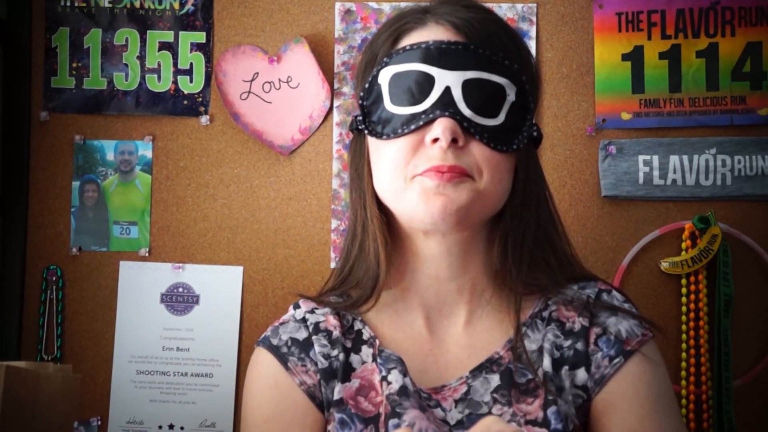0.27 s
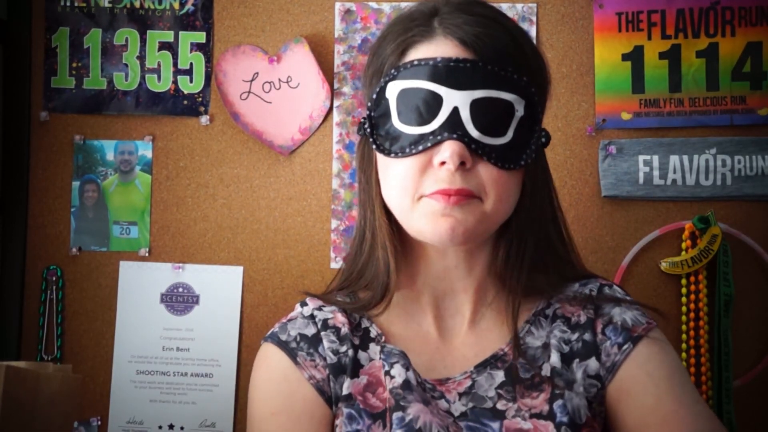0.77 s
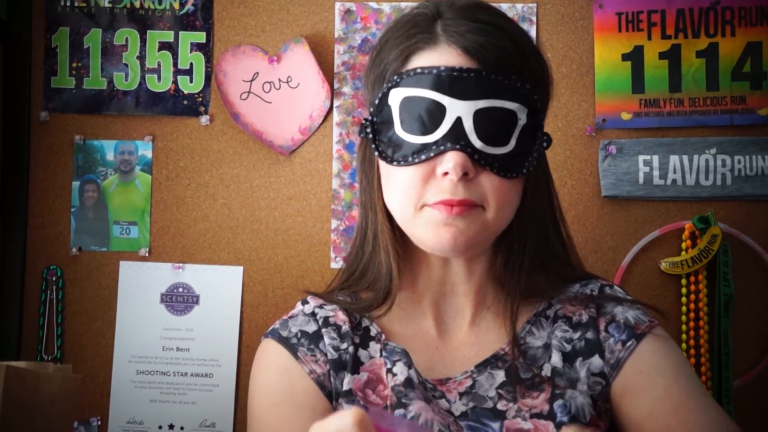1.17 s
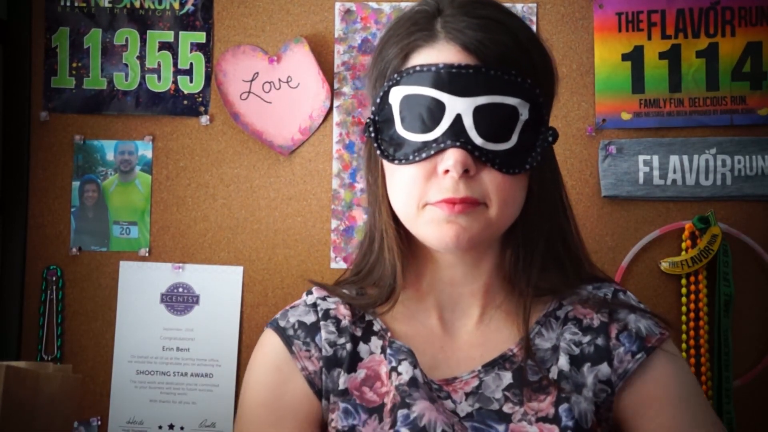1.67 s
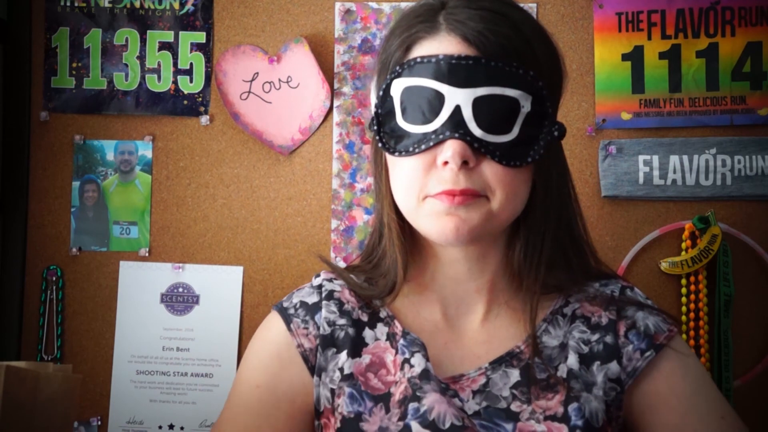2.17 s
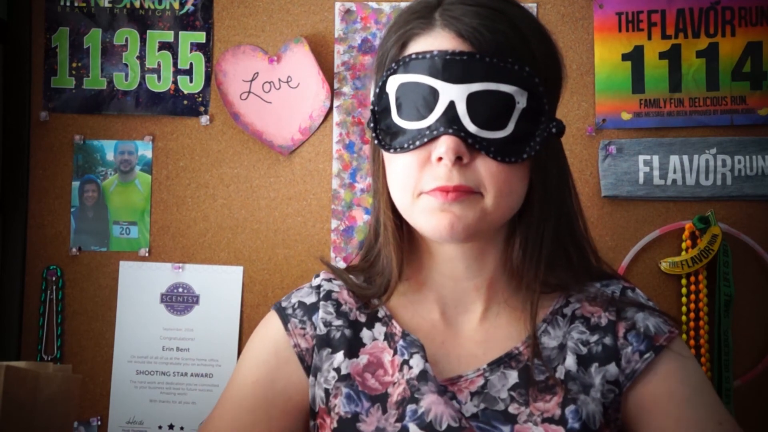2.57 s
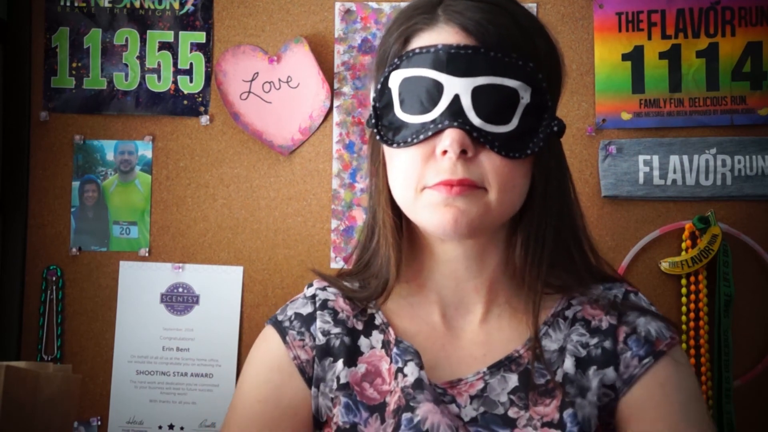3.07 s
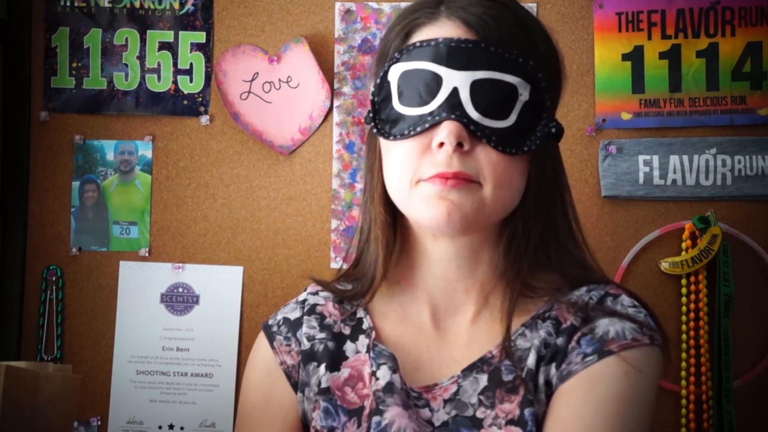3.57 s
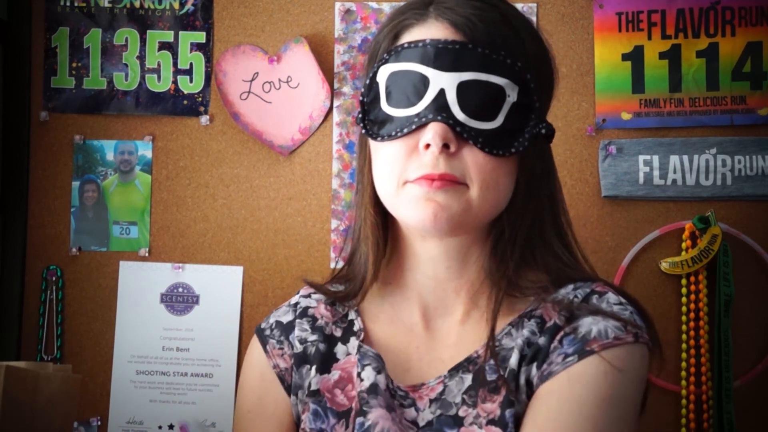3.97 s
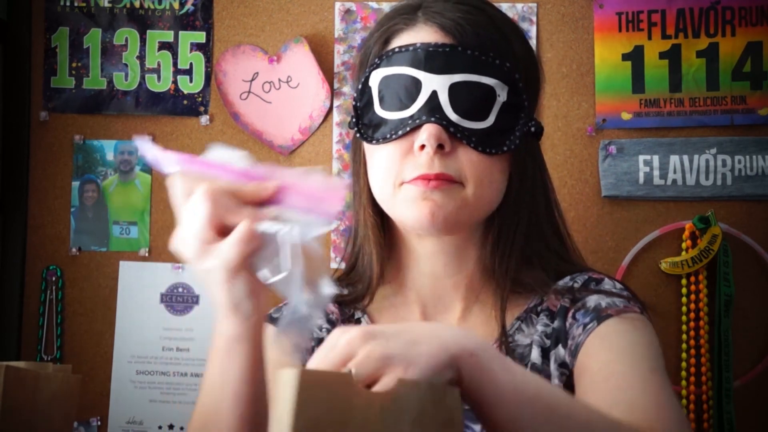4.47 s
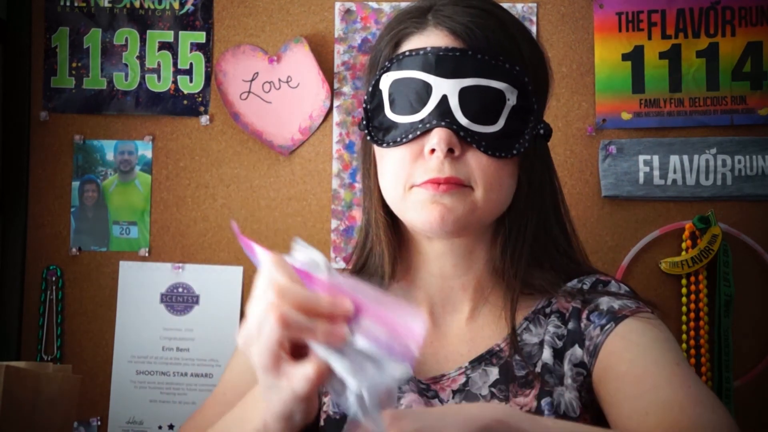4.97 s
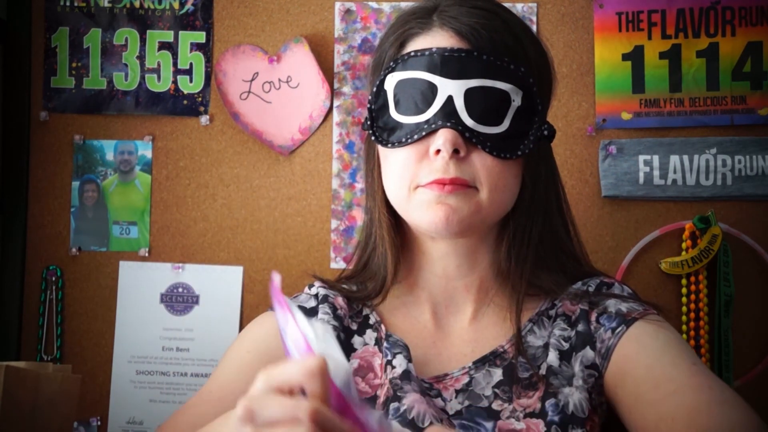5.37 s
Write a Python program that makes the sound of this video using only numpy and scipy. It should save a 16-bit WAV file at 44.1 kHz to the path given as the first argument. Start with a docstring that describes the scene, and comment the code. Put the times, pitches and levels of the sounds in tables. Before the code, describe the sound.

In a small room, hands fiddle with a thin plastic pouch: quiet, bright crackles and sharp ticks, growing busier. After about three and a half seconds a paper bag takes over with a soft hollow knock, then loud, coarse crumpling in surges. Close stereo microphone at arm's length, short room reflections, faint steady fan hum and hiss behind.

```python
"""First a thin plastic pouch crackles in the hands; from 3.44 s a brown paper bag does, in a small room.
Creases snap: short noise bursts, each ringing a facet, over a dense crackle of random clicks and hiss.
A hand knocks the hollow bag once: a rough push sets five decaying tones ringing.
Desk and walls send delayed copies and a fading noise tail to a stereo microphone at arm's length.
Behind it, coloured noise makes a faint fan hum, hiss and rumble."""
import sys
import numpy as np
from scipy import signal
from scipy.fft import rfft, irfft
from scipy.io import wavfile
from scipy.ndimage import uniform_filter1d, minimum_filter1d

SR = 44100
rng = np.random.default_rng(int(sys.argv[2]) if len(sys.argv) > 2 else 0)


def inscribe(sig):
    """Save sig as 16-bit PCM at rate SR to the path in sys.argv[1].

    A 1-D sig is mono; a 2-D sig holds one channel per row.
    Samples are clipped to [-1, 1] before scaling.
    """
    pcm = np.round(np.clip(np.atleast_2d(sig).T, -1, 1) * 32767)
    wavfile.write(sys.argv[1], SR, pcm.astype(np.int16))


N = 248724  # length in samples
SWAP_S = 3.44  # the pouch is put down, the paper bag taken
BOOM_HZ, CRISP_HZ = 1200, 4500  # boom lies below the first, crisp above the second, middle between

POUCH_FLIP_MS, BAG_FLIP_MS = 0.18, 0.6  # burst decay time: thin plastic flips faster than stiff paper
FACET_HZ = 2500  # ring of a middle-sized facet, for which BAG_FLIP_MS holds

# Creases that buckle audibly. Each row: start in seconds, level of the middle range in dB over one
# millisecond (before the common gain), ring in Hz, boom and crisp in dB relative to the middle.
SNAPS = [(0.0109, -29, 3200, -22, -21), (0.1223, -23, 4970, -6.5, 2), (0.1755, -36, 2750, -0.5, 6),
         (0.3159, -28.5, 2770, -13, 8.5), (0.3238, -35, 7660, -18, 20), (0.4036, -27, 4700, -13.5, -9.5),
         (0.602, -38.5, 3900, -25, 1), (0.7369, -28.5, 2100, -15, -3), (0.9251, -31, 5600, -1, 7.5),
         (0.9932, -41.5, 1980, 8, 4), (1.059, -40, 850, 8, -17), (1.1252, -39.5, 3000, 2.5, 6),
         (1.2347, -28, 1820, -2.5, -2.5), (1.4074, -38.5, 4730, 8.5, 5.5), (1.4487, -31.5, 3190, 3, -2.5),
         (1.5161, -31, 2330, -12, 2), (1.5772, -33.5, 2070, -1, 1), (1.5815, -32, 7350, 1, 6),
         (1.633, -30, 5500, -3, 2), (1.7682, -29, 2760, 1, 0), (1.8142, -35, 2130, 8.5, 10),
         (1.8438, -37.5, 1290, 7, 13.5), (1.8858, -22, 3400, -2, 0), (1.8908, -34, 8340, -7, 16.5),
         (1.925, -22, 6700, -18, 2), (1.978, -31, 3450, -28, 2.5), (1.9971, -22.5, 6100, -19, 4.5),
         (2.1425, -22, 1270, -4, -13), (2.1951, -23.5, 4460, -26, 0), (2.2009, -20, 2820, -22, -1.5),
         (2.284, -28.5, 1890, -19, 3.5), (2.3592, -28, 1240, -10, -1), (2.3678, -29.5, 4830, 1.5, 13),
         (2.5562, -13.5, 2160, -7.5, -5.5), (2.5936, -23, 2240, -16, -2.5), (2.652, -33, 2870, 4, 2),
         (2.6671, -16, 4400, -11, -7), (2.683, -26.5, 4480, -5, 4), (2.7484, -21.5, 1220, -5.5, -3),
         (2.8201, -31, 2240, 3, 9), (2.8739, -24.5, 1560, -1, -8.5), (2.9556, -30, 1190, -4, -0.5),
         (2.9693, -29, 3420, -3, -4), (3.0076, -26.5, 3880, -4, 8.5), (3.6857, -34.5, 1030, -20, -2),
         (3.7181, -23.5, 2050, -30, -13), (3.725, -19, 2320, -14, -9), (3.769, -18.5, 1890, 5, -20),
         (3.9169, -27, 1010, 6.5, -5), (3.936, -6.5, 2210, -3, -4), (4.045, -15.5, 1400, -3.5, -16),
         (4.0542, -16, 1270, -16, 3), (4.0668, -12.5, 2250, -2, 0.5), (4.1012, -10, 2160, 8, 2),
         (4.1614, -8, 1710, -14, -12), (4.2387, -6, 2500, -13.5, -2), (4.272, -15.5, 2470, -4, 0),
         (4.3267, -32, 3540, -26, 7.5), (4.3724, -28, 1830, 3.5, -13), (4.4607, -26.5, 2210, 3, -5),
         (4.4687, -21.5, 3400, 2, -16), (4.5426, -36.5, 1920, -26, 8), (4.6, -9, 2810, -8.5, -10),
         (4.7053, -28, 2880, -26, -2), (4.844, -27, 1280, -5, -28), (4.8728, -25.5, 1240, 3.5, -30),
         (4.9693, -35.5, 2100, 0, -19), (5.0057, -24, 1170, -0.5, -8), (5.0226, -25.5, 2220, 9.5, 3.5),
         (5.0731, -15, 3800, -2.5, -4), (5.1582, -28.5, 2540, -10, 10.5), (5.2032, -22.5, 3340, -2, 4.5),
         (5.2146, -25, 4970, -21, 9.5), (5.2314, -13.5, 1160, -7.5, -23), (5.2875, -27.5, 2240, -8, 2),
         (5.3057, -10.5, 1980, -11, -5.5), (5.3281, -16, 1230, 6.5, -15), (5.3845, -14.5, 900, -10, 4),
         (5.3874, -14, 2900, -24, 2), (5.6081, -20, 884, 4, -7), (5.6132, -19, 3500, -1.5, -20)]


def snaps(ring_db=-3, ring_cycles=2.2, gain_db=-2.0):
    """Each crease flips in a brief noise burst; the facet beside it rings a few cycles."""
    size = 256
    t = np.arange(size) / SR
    sheet = bands()
    chance = rng.standard_normal((len(SNAPS), 3, size))
    out = np.zeros(N + SR)
    for (start_s, db, hz, boom_db, crisp_db), noise in zip(SNAPS, chance):
        # a large paper facet rings low and flips slowly
        flip_ms = POUCH_FLIP_MS if start_s < SWAP_S else BAG_FLIP_MS * FACET_HZ / hz
        flip = noise * np.exp(-t * 1000 / flip_ms)

        ring = 2 * np.cos(2 * np.pi * hz * t) * np.exp(-t * hz / ring_cycles)
        facet = undb(ring_db) * hz / SR * ring
        flip = flip + signal.fftconvolve(flip, facet[None], axes=1)[:, :size]

        parts = signal.fftconvolve(flip, sheet, axes=1)
        parts = parts / np.linalg.norm(parts, axis=1, keepdims=True)
        level = undb(db + gain_db) * np.sqrt(SR / 1000)  # from energy 1 to a level over 1 ms
        snap = level * undb([boom_db, 0, crisp_db]) @ parts
        start = int(start_s * SR)
        out[start:start + len(snap)] += snap
    return out[:N]


def crackle(per_s=450.0, scatter_db=3.5, rub_db=-12, own_db=5.5, gain_db=0.5):
    """Many small creases of scattered size, over the hiss of fingers sliding on the sheet."""
    hit = rng.random(N) < per_s / SR
    sign = rng.choice([-1, 1], N)
    size = hit * sign * undb(scatter_db * np.minimum(rng.exponential(size=N), 3.0))
    parts = []
    for gain in hands():
        # every facet has its own balance of boom and crispness
        own = undb(own_db * rng.standard_normal(N).clip(-2, 2))
        grains = unit(size * own)
        rub = undb(rub_db) * rng.standard_normal(N)
        parts.append(gain * undb(gain_db) * (grains + rub))
    return signal.oaconvolve(np.array(parts), bands(), axes=1)[:, :N].sum(axis=0)


POUCH_BOOM_DB, BAG_BOOM_DB = -5, -3  # boom of the crackle against its middle
# Crisp range against the middle, for a level of -40 dB, and its change per dB of level:
# harder handling bends larger facets and is duller.
CRISP_DB, CRISP_PER_DB = -2.5, -0.053

# Fingers shifting on the sheet, a slow bed of crackle.
# Each row: time in seconds, level in dB before the crackle's common gain.
GRIP = [(0.0, -62), (0.14, -62.5), (0.7, -55.5), (0.8, -57.5), (1.3, -54.5), (1.6, -45), (1.9, -49),
        (2.03, -50), (2.14, -45), (2.37, -41), (2.44, -53.5), (2.58, -48), (2.9, -50), (3.03, -43),
        (3.48, -81.5), (4.6, -47), (4.95, -65), (5.13, -47), (5.5, -49.5), (5.64, -48)]
# Squeezes, each a rush of crackle. Each row: peak time in seconds, peak level in dB (before that gain),
# swell and then fade in milliseconds per 10 dB, extra brightness of the crisp range in dB.
SQUEEZES = [(0.0, -40, 20, 20, -0.5), (0.187, -55, 57, 31, 13), (0.325, -53, 3.3, 3.3, 21),
            (0.741, -34, 7.6, 2.2, 8), (1.62, -58, 34, 18, -10), (2.0, -46.5, 44, 32, 6),
            (2.14, -35.5, 22, 8.5, 3), (2.387, -31.5, 34, 6.7, -2.5), (2.559, -55, 18, 15, -5),
            (3.009, -31.5, 17, 5.6, 2.5), (3.379, -50, 8.6, 9.3, 3), (3.5, -47, 21, 16, -2.5),
            (3.708, -34.5, 10, 23, -10), (3.742, -30, 20, 56, 7.5), (3.773, -19, 13, 16, -6),
            (3.8, -27.5, 17, 49, -7), (3.944, -29, 40, 39, -3), (4.056, -26, 31, 30, -2.5),
            (4.115, -18, 33, 23, -1), (4.17, -21.5, 59, 18, -3.5), (4.209, -34.5, 11, 41, 2.5),
            (4.267, -39, 25, 81, 5.5), (4.467, -30.5, 15, 29, -3), (4.603, -23, 3, 3.8, 11.5),
            (4.787, -41.5, 105, 67, 1), (5.079, -33, 72, 54, -2), (5.216, -24, 37, 26, -0.5),
            (5.322, -27.5, 31, 72, 0), (5.389, -24.5, 21, 38, 3.5), (5.473, -27.5, 61, 32, 0),
            (5.617, -24, 9.8, 8.9, -1.5)]


def hands():
    """Level of the crackle in its boom, middle and crisp range: grip and squeezes add in power."""
    t = np.arange(0, N + 64, 64) / SR  # one value per 64 samples is enough
    peak_s, db, swell_ms, fade_ms, bright_db = np.transpose(SQUEEZES)[:, :, None]
    late_ms = (t - peak_s) * 1000
    squeeze_db = db - 10 * np.maximum(-late_ms / swell_ms, late_ms / fade_ms)
    grip_db = np.interp(t, *np.transpose(GRIP))

    level_db = np.vstack([squeeze_db, grip_db])
    peak_db = np.vstack([db + 0 * t, grip_db])
    bright_db = np.vstack([bright_db, [0]])  # the grip has no extra brightness
    boom_db = np.where(t < SWAP_S, POUCH_BOOM_DB, BAG_BOOM_DB)
    crisp_db = CRISP_DB + CRISP_PER_DB * (peak_db + 40) + bright_db

    gains = []
    for band_db in (boom_db, 0, crisp_db):
        gain = np.sqrt(np.sum(undb(level_db + band_db) ** 2, axis=0))
        gains.append(np.interp(np.arange(N) / SR, t, gain))
    return gains


# Colour of a buckling sheet at the microphone; only its shape within each range counts.
# Each row: frequency in Hz, strength in dB per Hz.
SHEET = [(35, -77), (60, -34), (173, -18), (252, -18), (350, -7.5), (393, -7), (777, -2.5), (1240, 2.5),
         (1430, 0.5), (2580, 0.5), (4980, -2), (11600, -16), (15400, -24.5), (16500, -88)]


def bands():
    """Responses of the sheet in its boom, middle and crisp range, each of energy 1."""
    cuts = [(BOOM_HZ, "low"), ([BOOM_HZ, CRISP_HZ], "band"), (CRISP_HZ, "high")]
    kernels = []
    for hz, kind in cuts:
        cut = signal.butter(2, hz, kind, fs=SR, output="sos")
        kernels.append(signal.sosfilt(cut, causal(SHEET)))
    return np.array(kernels) / np.linalg.norm(kernels, axis=1, keepdims=True)


KNOCK_S, KNOCK_DB = 3.492, -29.5  # start, and peak level before the sheet and room filters
KNOCK_PUSH_MS = 8.1  # the push is strongest after half this time

# Tones of the hollow bag. Each row: frequency in Hz, level in dB relative to the other tones,
# time to fade by 60 dB in seconds.
HOLLOW = [(325, -11.5, 0.096), (1070, -4, 0.029), (1216, 4, 0.026), (1530, -1, 0.024), (1930, -8, .015)]


def knock():
    """A soft, rough push sets the hollow bag ringing."""
    t = np.arange(SR // 4) / SR
    push = rng.standard_normal(len(t)) * t * np.exp(-t * 2000 / KNOCK_PUSH_MS)
    ring = sum(undb(db - 60 * t / t60) * np.sin(2 * np.pi * hz * t) for hz, db, t60 in HOLLOW)
    sound = signal.fftconvolve(push, ring)[:len(t)]
    out = np.zeros(N)
    out[int(KNOCK_S * SR):][:len(t)] = undb(KNOCK_DB) * sound / np.abs(sound).max()
    return out


MOVE_S = 0.06  # the paths to the microphone are drawn anew this often
SIDE_DB, LAG = -3, -0.44  # average left minus right of the direct sound: level in dB, delay in samples
SWAY_DB, SWAY_LAG = 5.5, 1  # random spread of both as the hands move
POUCH_NEAR_DB = 0.5  # the pouch is held closer, so its direct sound is stronger
TAIL_DB = 3.5  # energy of the tail

# Echoes from desk and walls. Each row: average delay in milliseconds, level in dB,
# left minus right delay in samples.
ECHOES = [(2.0, -9, 1.5), (3.2, -10, -2), (5.8, -8, 2), (6.6, -5, -1), (7.6, -6, 3), (15.5, -12, -4),
          (20.5, -12, 3)]
# How long the tail lasts. Each row: frequency in Hz, time to fade by 60 dB in seconds.
ROOM = [(150, 0.25), (600, 0.33), (2500, 0.26), (8000, 0.14), (14000, 0.078)]


def room(x):
    """Echoes from desk and walls, each from its own side, then a tail that dies sooner in the treble."""
    size, hop = 16384, int(MOVE_S * SR)
    t = np.arange(size) / SR
    f = np.arange(size // 2 + 1) * SR / size
    centres = np.log([hz for hz, _ in ROOM])
    shares = [np.interp(np.log(f + 1), centres, row) for row in np.eye(len(ROOM))]
    fades = [undb(-60 * t / t60) * (1 - np.exp(-t / 0.001)) for _, t60 in ROOM]
    side = np.array([[0.5], [-0.5]])  # left, right

    out = np.zeros((2, N + 2 * hop + size))
    padded, window = np.pad(x, hop), np.hanning(2 * hop)
    # the sheet keeps moving: overlapping pieces get fresh paths
    for i in range(0, N + hop, hop):
        early = 0
        for ms, db, lag in ECHOES:
            delay_s = (ms + 0.2214 * rng.standard_normal()) / 1000 + lag * side / SR
            early = early + undb(db) * np.exp(-2j * np.pi * f * delay_s)

        near_db = POUCH_NEAR_DB * (i < SWAP_S * SR)
        sway = rng.standard_normal(2)
        direct_lag = 4 + (LAG + SWAY_LAG * sway[0]) * side  # 4 samples keep both delays positive
        direct_db = near_db + (SIDE_DB + SWAY_DB * sway[1]) * side
        early = early + undb(direct_db) * np.exp(-2j * np.pi * f * direct_lag / SR)

        noise = rfft(diffuse(size))
        tail = sum(irfft(noise * share, size) * fade for share, fade in zip(shares, fades))
        tail = tail / np.sqrt(np.sum(tail ** 2) / 2)
        response = irfft(early, size) + undb(TAIL_DB) * tail

        piece = padded[None, i:i + 2 * hop] * window[:len(padded) - i]
        heard = signal.fftconvolve(piece, response, axes=1)
        out[:, i:i + heard.shape[1]] += heard
    return out[:, hop:N + hop]


AIR_DB = -48  # level of fan hum and hiss
RUMBLE_DB, RUMBLE_HZ = -82, 120  # level, and frequency above which it weakens

# Colour of the fan hum and hiss. Each row: frequency in Hz, relative strength in dB per Hz.
AIR = [(60, -31), (200, -17.5), (400, -2.5), (480, -3), (540, 8), (620, -4), (1500, -3.5), (4000, -7),
       (9000, -14.5), (15500, -24), (16500, -29)]


def air():
    """Fan hum and hiss from all sides, and a faint rumble of its own in each microphone."""
    low = signal.butter(1, RUMBLE_HZ, fs=SR, output="sos")
    rumble = signal.sosfilt(low, rng.standard_normal((2, N)))
    fan = unit(colour(diffuse(N), AIR))
    return undb(AIR_DB) * fan + undb(RUMBLE_DB) * unit(rumble)


# How wide sound from all sides is at the two microphone ports.
# Each row: frequency in Hz, side minus mid in dB.
WIDTH = [(60, -14), (200, -14), (500, -12), (1000, -8), (2000, -4), (4000, -1), (8000, 0), (15000, 0)]


def diffuse(size):
    """Noise from all sides: alike at both ports in the bass, unrelated in the treble."""
    mid, side = rng.standard_normal((2, size))
    side = colour(side, WIDTH)
    return np.array([mid + side, mid - side])


def undb(db):
    """Turn decibels into an amplitude factor."""
    return 10 ** (np.asarray(db) / 20)


def unit(x):
    """Scale to an RMS level of 1."""
    return x / np.sqrt(np.mean(x ** 2))


def colour(x, points):
    """Filter through (Hz, dB) points without any delay (zero phase)."""
    hz, db = np.transpose(points)
    size = x.shape[-1]
    f = np.arange(size // 2 + 1) * SR / size
    gain = undb(np.interp(np.log(f + 1), np.log(hz), db))
    return irfft(rfft(x) * gain, size)


def causal(points, size=1024):
    """Response through (Hz, dB) points that starts at once (minimum phase)."""
    strength = np.abs(rfft(colour(np.eye(1, size)[0], points)))
    cepstrum = irfft(np.log(strength + 1e-9), size)
    # folding the cepstrum forward moves the energy to the start
    cepstrum[1:size // 2] *= 2
    cepstrum[size // 2 + 1:] = 0
    return irfft(np.exp(rfft(cepstrum)), size)


POUCH_HZ, BAG_HZ = 446, 167  # lowest sound that each sheet radiates well
POUCH_SHINE_DB, POUCH_SHINE_HZ = -0.5, 9800  # added treble: plastic is brighter at the very top


def scene():
    """Pouch, then bag, each radiating poorly in the bass, heard in the room over the background."""
    sheets = snaps() + crackle() + knock()
    pouch, bag = (signal.sosfilt(signal.butter(3, hz, "high", fs=SR, output="sos"), sheets)
                  for hz in (POUCH_HZ, BAG_HZ))
    high = signal.butter(2, POUCH_SHINE_HZ, "high", fs=SR, output="sos")
    pouch = pouch + undb(POUCH_SHINE_DB) * signal.sosfiltfilt(high, pouch)
    swap = int(SWAP_S * SR)
    return room(np.concatenate([pouch[:swap], bag[swap:]])) + air()


CEILING, LIMIT_MS = 0.85, 6  # limiter: highest peak before the top cut, time over which its gain moves
TOP_HZ = 15800  # the top is cut above this

# The two ports differ a little in colour. Each row: frequency in Hz, left minus right in dB.
LEFT_PORT = [(100, -1), (500, 0), (4000, 0), (12000, 3)]


def record(dry):
    """The ports colour the sound a little; a quick limiter holds the peaks; the top is cut steeply."""
    ports = np.array([colour(x, [(hz, db * half) for hz, db in LEFT_PORT])
                      for x, half in zip(dry, (0.5, -0.5))])
    size = int(LIMIT_MS * SR / 1000)
    needed_gain = CEILING / np.maximum(np.abs(ports).max(axis=0), CEILING)
    gain = uniform_filter1d(minimum_filter1d(needed_gain, 2 * size), size)
    top_cut = signal.ellip(8, 0.2, 60, TOP_HZ, fs=SR, output="sos")
    return signal.sosfilt(top_cut, gain * ports)


dry = scene()
out = record(dry)
inscribe(out)
```